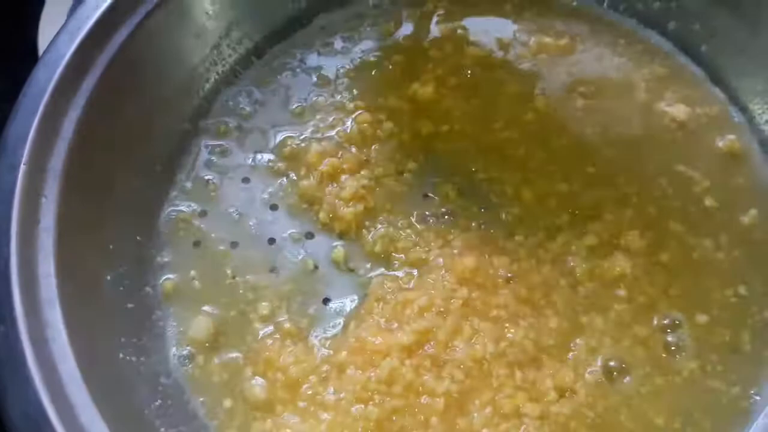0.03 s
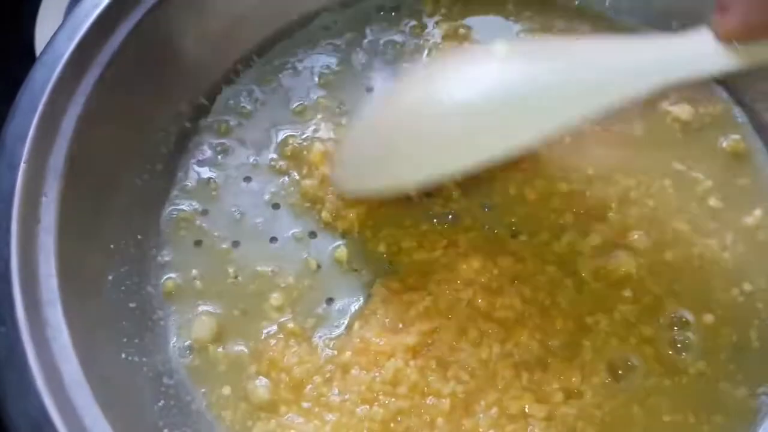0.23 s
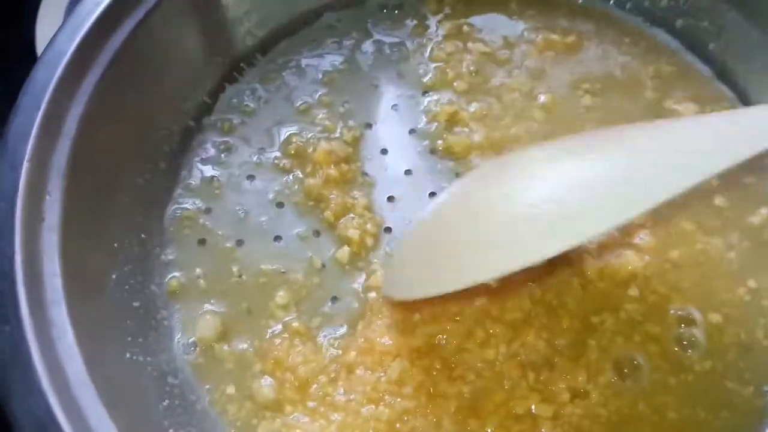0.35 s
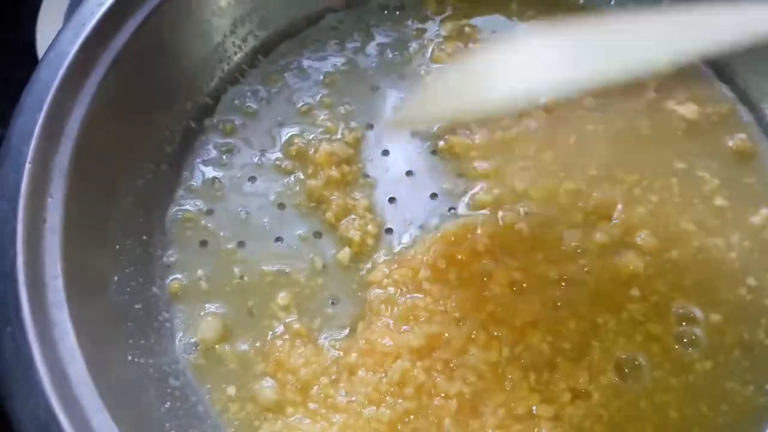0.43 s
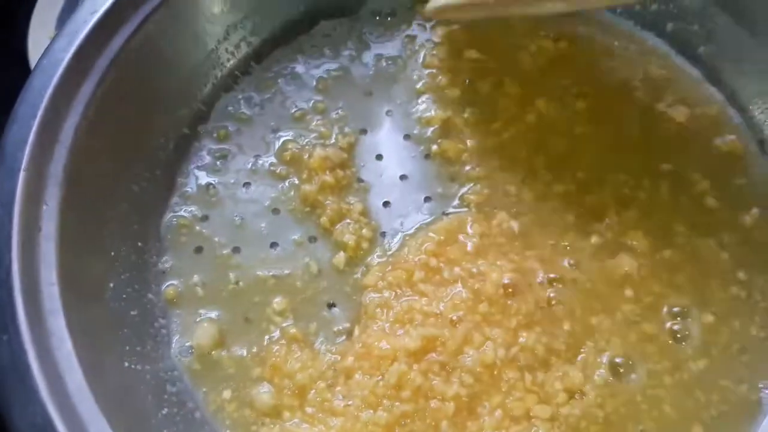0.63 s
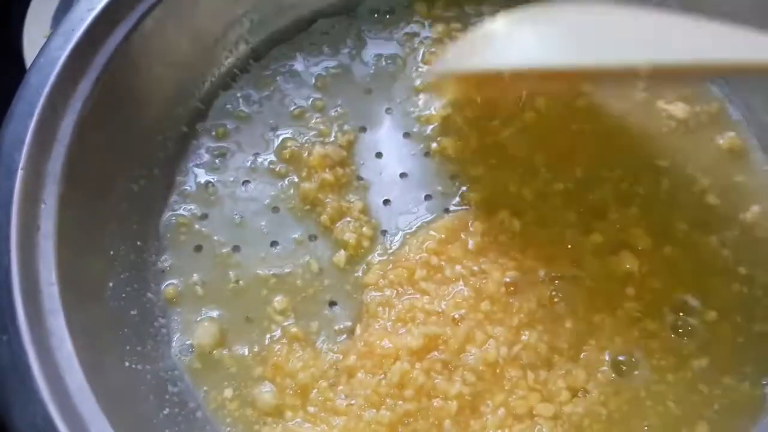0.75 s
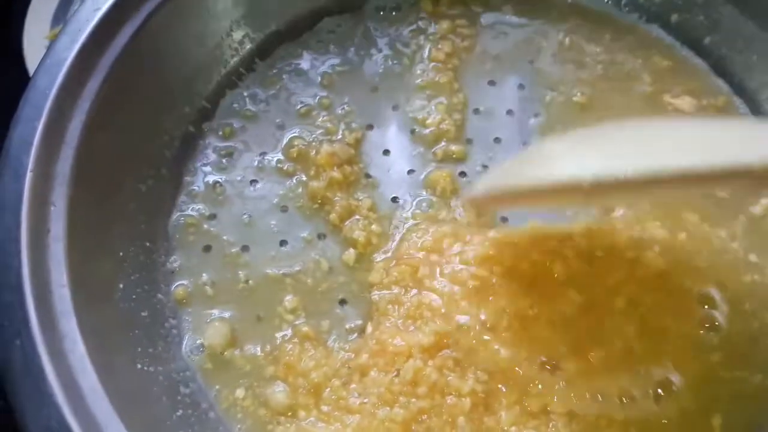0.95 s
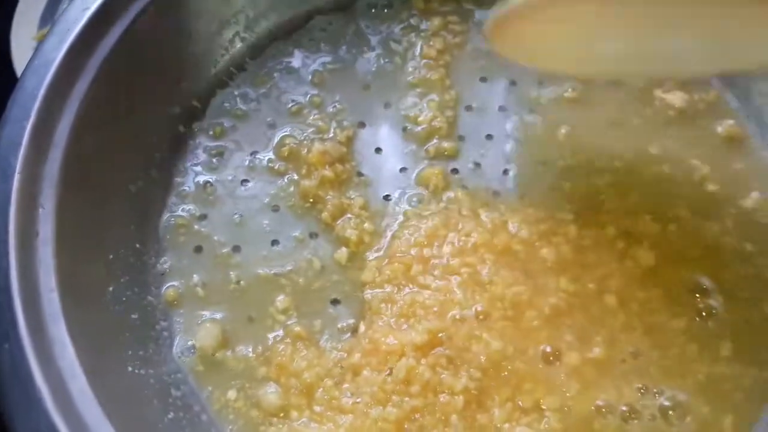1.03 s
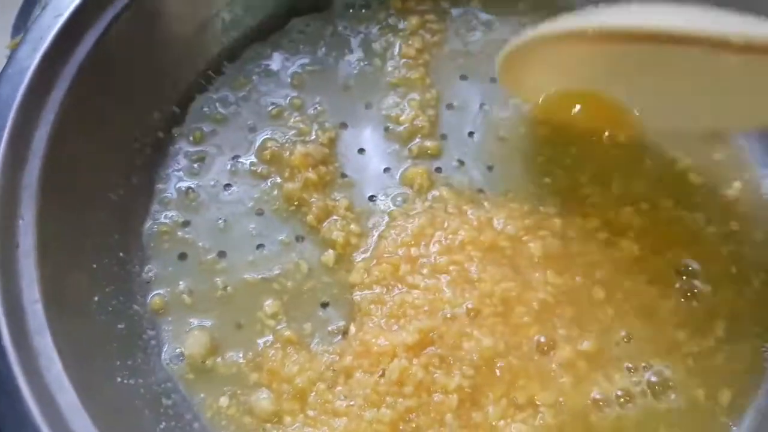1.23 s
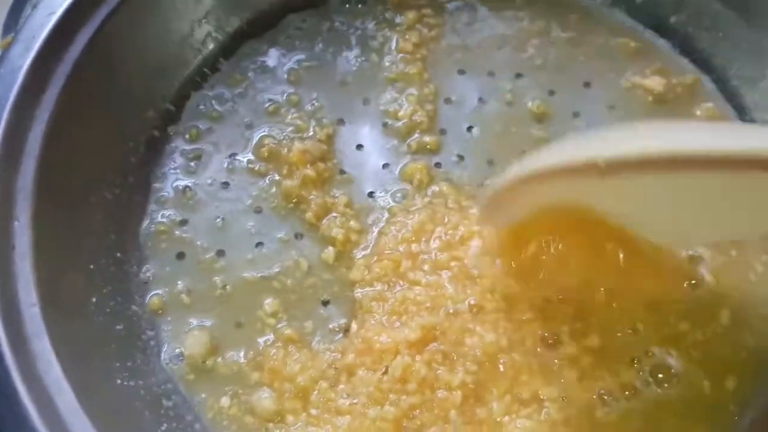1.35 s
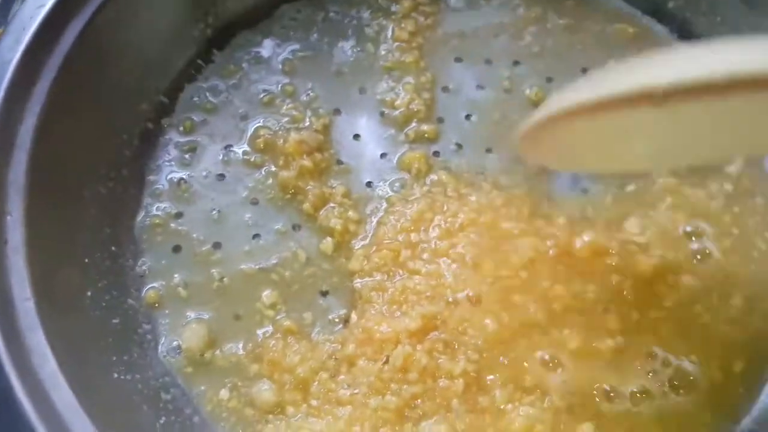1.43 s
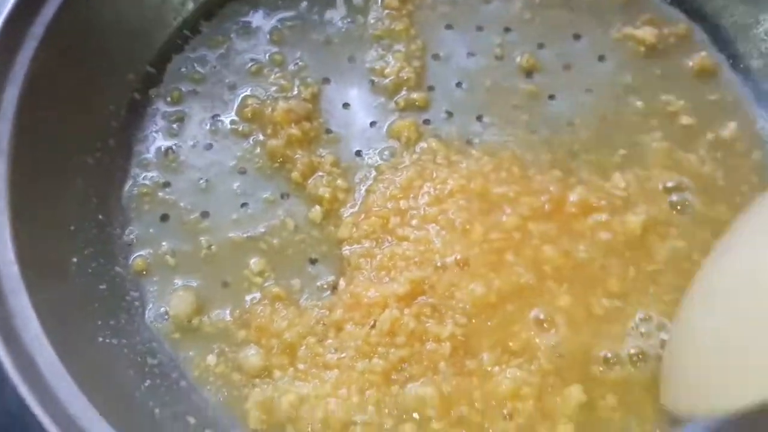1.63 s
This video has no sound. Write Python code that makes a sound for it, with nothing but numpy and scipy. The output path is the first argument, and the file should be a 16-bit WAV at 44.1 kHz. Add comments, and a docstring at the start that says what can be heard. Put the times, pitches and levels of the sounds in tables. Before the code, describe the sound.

Close up in a quiet kitchen, a plastic spoon bumps and rasps over a metal strainer three times, with short pauses between. The steel clanks and groans briefly, the pot underneath resonates, and wet pulp squelches very softly.

```python
"""A plastic spoon works wet pulp through a steel strainer; close, small kitchen, faint air and hum.
0.2 s: first stroke. The loaded sheet booms, the edge rasps over the holes, the pot below rings low.
0.4-0.7 s: the spoon squeaks thinly on wet steel; the pulp squelches softly.
0.7 s, 1.2 s: second and third strokes, again with groans of the sheet and knocks on the wall.
1.55 s: a last squelch while pot and room die away."""
import sys
import numpy as np
from scipy import signal
from scipy.fft import rfft, irfft, next_fast_len
from scipy.io import wavfile

SR = 44100
rng = np.random.default_rng(int(sys.argv[2]) if len(sys.argv) > 2 else 0)


def unload_audio(sound):
    """Save the sound as a 16-bit wav file, at the path given as the first command line argument."""
    columns = np.transpose(np.atleast_2d(sound))
    # keep every value between -1 and 1, then stretch to whole-number steps
    steps = np.round(np.clip(columns, -1, 1) * 32767)
    wavfile.write(sys.argv[1], SR, steps.astype(np.int16))


N = 74970
T = np.arange(N) / SR

# spoon contacts: start_s, boom_hz, boom_db, pot_db, spot_hz, clank_db, wall_db, click_db, lowpass_hz
CONTACTS = [(0.2161, 321.6, -23.5, -27.5, 1134, -29, -50, -45, 11000),
            (0.2805, 315.2, -31, -29.5, 1141, -32, -44, -49.5, 7000),
            (0.2985, 324.6, -25, -40, 1077, -35, -48, -56, 5000),
            (0.3180, 317.8, -25.5, -27, 540, -32.5, -62, -64, 2930),
            (0.3890, 308, -34.5, -31.5, 1074, -43.5, -63, -46, 11200),
            (0.7290, 307, -27, -25.5, 1114, -32.5, -50, -48.5, 3120),
            (0.7480, 305.8, -25, -32, 1150, -39.5, -55, -58, 8000),
            (0.8520, 342.7, -36.5, -28.5, 1225, -42, -52, -39.5, 14300),
            (0.8730, 306, -37, -21.5, 984, -37.5, -74, -44.5, 9400),
            (0.9166, 362, -31, -24.5, 1014, -25, -40, -38, 7400),
            (0.9740, 300, -39, -51, 720, -69, -83, -53.5, 6250),
            (1.211, 266, -40, -31.5, 470, -66, -58, -78, 2020),
            (1.2642, 297.6, -34, -24, 537, -29.5, -41.5, -43, 12400),
            (1.3140, 313.6, -38.5, -38.5, 1106, -33, -48, -47, 9900),
            (1.3862, 292, -32.5, -22.5, 1095, -27, -38, -37, 10500),
            (1.4300, 331.5, -37.5, -28.5, 981, -36, -58, -43.5, 4000)]
# spoon dragged over the holes: start_s, length_s, judder_db, rasp_db
DRAGS = [(0.226, 0.066, -35, -53.5), (0.284, 0.036, -30.5, -48.5), (0.331, 0.052, -49.5, -52),
         (0.387, 0.012, -36.5, -44), (0.737, 0.057, -36, -65), (0.79, 0.056, -50, -56.5),
         (0.859, 0.059, -38, -51.5), (0.924, 0.03, -40.5, -47.5), (1.19, 0.099, -56, -69.5),
         (1.268, 0.041, -31, -54), (1.322, 0.0473, -42, -54), (1.384, 0.031, -31.5, -53)]
# friction tones: start_s, length_s, pitch_hz, level_db
SHEET_GROANS = [(0.2303, 0.06, 315.5, -25), (0.315, 0.027, 303, -30.5), (0.738, 0.037, 308.5, -31.5),
                (1.285, 0.059, 306.5, -36)]
SPOON_SQUEAKS = [(0.425, 0.02, 3000, -65), (0.654, .055, 2430, -67.5)]
# pulp shifting: start_s, length_s, pitch_hz, log_pitch_spread, level_db
PULP_SHIFTS = [(0.546, 0.018, 3230, 0.11, -65.5), (0.654, 0.054, 2670, 0.18, -67.5),
               (1.179, 0.13, 2160, .2, -62), (1.187, 0.068, 406, 0.26, -49.5),
               (1.564, 0.066, 3519, 0.3, -69.5)]

# modes of pot with strainer, sheet (mid, high), bare wall: pitch_hz, gain_db, t60_s
POT_MODES = [(92.3, -18, 0.79), (108.9, -14.5, 0.2), (127, -27.5, 0.067), (209.6, -12, 0.15),
             (233.2, -22.5, 0.92), (269.4, -16, 0.36), (358, -9.5, 0.4), (398.4, -10, 0.29)]
SHEET_MODES = [(539, -9, 0.46), (553.2, 0, 0.28), (694.7, 0, 0.23), (741, -5, 0.28), (828.4, -5, 0.22),
               (994, -12, 0.14), (1150, -1.5, 0.13), (1244.5, -0.5, 0.14), (1300, -26, 0.89)]
PING_MODES = [(3663, 3, 0.094), (3950, -1, 0.17), (4280, 1.5, 0.092), (5000, -6, 0.11), (5520, -3, 0.066),
              (7320, -18, .12), (8190, -22, 0.066)]
WALL_MODES = [(1498, -8.5, 0.18), (1706, -6.5, 0.2), (1795, -5, 0.23), (1938, 5.5, 0.054), (2019, 0, 0.088),
              (2063, -3.5, 0.049), (2368, -7.5, 0.16)]

# contact noise spectra: freq_hz, gain_db
CLANK_SPECTRUM = [(60, -46), (120, 2), (180, -12), (280, 12), (450, 0), (680, 7.5), (880, -3.5),
                  (1080, 6.5), (1500, -8), (2020, -9.5), (2600, -30), (5000, -47)]
CLICK_SPECTRUM = [(800, 7.5), (2000, 4), (3100, 0), (3900, 0), (4600, -1.5), (5250, 6), (6300, -1),
                  (7150, 1.5), (7950, -5), (8600, 1.5), (9900, -8), (12500, -8.5), (15500, -28)]
JUDDER_SPECTRUM = [(50, -76), (110, 4.5), (170, -11.5), (320, 15.5), (450, 3), (560, 2), (880, -6),
                   (1100, -6), (1500, -12), (2000, -16.5), (2800, -23.5), (6000, -51)]
# room air spectra, mid and side: freq_hz, gain_db
AIR_SPECTRUM = [(15, -33), (25, -13), (150, -5.5), (309, 0), (573, -12.5), (637, -5.5), (691, -16),
                (811, -9.5), (1310, -21.5), (3440, -29.5), (4040, -28), (4620, -38.5), (15000, -46.5)]
SIDE_AIR_SPECTRUM = [(25, 4), (100, -5), (400, -4.5), (1500, -7), (5000, -19), (9000, -25), (15000, -36.5)]
# room decay: freq_hz, t60_s
ROOM_DECAY = [(100, 0.26), (300, 0.53), (1000, 0.47), (2500, 0.42), (6000, 0.3), (12000, 0.63)]
# room tail and side reflections: freq_hz, gain_db
ROOM_GAIN = [(100, -23), (300, -13), (700, -11), (2000, -9.5), (6000, -6.5), (12000, -27)]
SIDE_GAIN = [(30, -26), (70, -32), (300, -43), (1000, -34), (2500, -17.5), (5000, -17), (12000, -12)]

BOOM_T60_S, SPOT_T60_S, CLANK_T60_S, CLICK_T60_S, CRACK_T60_S = 0.18, 0.13, 0.11, 0.067, 0.007
BOOM_RISE_S, POT_RISE_S, SWELL_S, RELEASE_T60_S = 0.0015, 0.015, 0.0058, 0.056
POT_TRIM_DB, SHEET_TRIM_DB, SPOT_TRIM_DB = -3.5, -7.5, -11
CLANK_NOISE_TRIM_DB, PING_TRIM_DB, CRACK_TRIM_DB = -4, -12, -6


def knocks():
    """Each contact booms the laden sheet and the pot, rings the steel and clicks; pulp dulls it."""
    out = np.zeros(N)
    for start_s, boom_hz, boom_db, pot_db, spot_hz, clank_db, wall_db, click_db, lowpass_hz in CONTACTS:
        boom = unit_onset(-sine(boom_hz) * decay(BOOM_T60_S) * (1 - np.exp(-T / BOOM_RISE_S)))
        pot = amp(POT_TRIM_DB) * ring(POT_MODES, scatter_db=3.5) * (1 - np.exp(-T / POT_RISE_S))
        clank = amp(SHEET_TRIM_DB) * unit_onset(ring(SHEET_MODES, scatter_db=2.5))
        clank += amp(SPOT_TRIM_DB) * unit_onset(sine(spot_hz) * decay(SPOT_T60_S))
        clank += amp(CLANK_NOISE_TRIM_DB) * burst(CLANK_SPECTRUM, CLANK_T60_S)
        click = burst(CLICK_SPECTRUM, CLICK_T60_S)
        click += amp(PING_TRIM_DB) * unit_onset(ring(PING_MODES, scatter_db=5.5))
        click += amp(CRACK_TRIM_DB) * burst(CLICK_SPECTRUM, CRACK_T60_S)
        wall = unit_onset(ring(WALL_MODES, scatter_db=1.5))
        blow = amp(boom_db) * boom + amp(pot_db) * pot
        blow += amp(clank_db) * clank + amp(click_db) * click + amp(wall_db) * wall
        out += delayed(kitchen(butterworth(blow, lowpass_hz, "low")), start_s)
    return out


def scrapes(rise_s=0.0047):
    """The spoon's edge catches on holes and grit: the sheet judders and rasps."""
    judder_env = sum(amp(db) * envelope(start_s, length_s, rise_s) for start_s, length_s, db, _ in DRAGS)
    rasp_env = sum(amp(db) * envelope(start_s, length_s, rise_s) for start_s, length_s, _, db in DRAGS)
    judder = coloured(catches(rate_per_s=900), JUDDER_SPECTRUM)
    rasp = grit_clumps() * coloured(catches(rate_per_s=3500), CLICK_SPECTRUM)
    return kitchen(judder_env * judder + rasp_env * rasp)


def catches(rate_per_s, spread_db=3.5):
    """Tiny irregular impulses of uneven size."""
    hits = rng.random(N) < rate_per_s / SR
    return hits * amp(spread_db * np.clip(noise(), -2, 2)) * rng.choice([-1, 1], N)


def grit_clumps(depth_db=2, cutoff_hz=120):
    """Uneven gain: grit passes under the edge in bunches."""
    return unit_rms(amp(depth_db * np.clip(drift(cutoff_hz), -2, 2)))


def friction_tones():
    """The sheet groans under pressure and squeaks under a light touch."""
    groans = stick_slip(SHEET_GROANS, wander_ratio=0.012, wander_cutoff_hz=41.2, rise_s=0.012)
    squeaks = stick_slip(SPOON_SQUEAKS, wander_ratio=0.04, wander_cutoff_hz=300, rise_s=SWELL_S)
    return groans + squeaks


def stick_slip(tones, wander_ratio, wander_cutoff_hz, rise_s):
    """Unsteady tones kept up by sticking and slipping."""
    out = np.zeros(N)
    for start_s, length_s, pitch_hz, level_db in tones:
        freq_hz = pitch_hz * (1 + wander_ratio * drift(wander_cutoff_hz))
        cycles = np.cumsum(freq_hz * (T > start_s)) / SR
        tone = np.sqrt(2) * np.sin(2 * np.pi * cycles)
        out += amp(level_db) * envelope(start_s, length_s, rise_s) * tone
    return kitchen(out)


def squelches(count=400, rate_per_s=2500, bubble_q=18, pop_samples=900):
    """Swarms of tiny bubbles burst as the pulp shifts."""
    out, t = np.zeros(N), T[:pop_samples]
    for start_s, length_s, pitch_hz, spread, level_db in PULP_SHIFTS:
        onsets = (rng.random((count, 1)) * SR * count / rate_per_s).astype(int)
        cycles = pitch_hz * np.exp(spread * rng.standard_normal((count, 1))) * t
        pop_env = rng.random((count, 1)) * (1 - t / t[-1]) * np.exp(-np.pi * cycles / bubble_q)
        pops = pop_env * np.sin(2 * np.pi * cycles)
        swarm = unit_rms(np.bincount((onsets + np.arange(pop_samples)).ravel(), pops.ravel()))
        swarm = delayed(np.pad(swarm, (0, N)), start_s)
        out += amp(level_db) * envelope(start_s, length_s, SWELL_S) * swarm
    return kitchen(out)


def kitchen(x, predelay_s=0.005):
    """Direct sound plus the room's short diffuse tail."""
    hz, t, spectra = signal.stft(rng.standard_normal(SR * 2 // 3), SR, nperseg=256)
    decay_per_s = np.log(1000) / log_interp(ROOM_DECAY, hz)[:, None]
    tail_env = np.exp(-decay_per_s * t) * np.sqrt(2 * decay_per_s / SR)  # unit energy
    gain = amp(log_interp(ROOM_GAIN, hz))[:, None]
    tail = signal.istft(spectra * tail_env * gain, SR, nperseg=256)[1]
    return x + delayed(signal.fftconvolve(x, tail)[:N], predelay_s)


def side_reflections(x, t60_s=0.19):
    """Scattered reflections widen the treble a little."""
    scatter = noise() * decay(t60_s)
    reflections = signal.fftconvolve(x, scatter / np.linalg.norm(scatter))[:N]
    return filtered(reflections, lambda hz: amp(log_interp(SIDE_GAIN, hz)))


def background(air_db=-63, side_air_db=-76.5, hum_hz=93.6, hum_db=-70.5):
    """Still room air with a faint low hum: (mid, side)."""
    side = amp(side_air_db) * coloured(noise(), SIDE_AIR_SPECTRUM)
    mid = amp(air_db) * coloured(noise(), AIR_SPECTRUM) + amp(hum_db) * sine(hum_hz)
    return mid, side


def ring(modes, scatter_db):
    """Damped modes, 1 s long; levels vary per strike."""
    out = sum(amp(db + scatter_db * rng.normal()) * decay(t60_s)[:SR] * np.sin(2 * np.pi * hz * T[:SR])
              for hz, db, t60_s in modes)
    return np.pad(out, (0, N - SR))


def burst(spectrum, t60_s):
    """Decaying coloured noise."""
    return unit_onset(coloured(noise(), spectrum) * decay(t60_s))


def envelope(start_s, length_s, rise_s):
    """Rise, hold, release."""
    attack = 1 - np.exp(-np.maximum(T - start_s, 0) / rise_s)
    return attack * np.exp(-np.log(1000) * np.maximum(T - start_s - length_s, 0) / RELEASE_T60_S)


def amp(db):
    return 10 ** (np.asarray(db) / 20)


def sine(hz):
    return np.sin(2 * np.pi * hz * T)


def noise():
    return rng.standard_normal(N)


def drift(cutoff_hz):
    return unit_rms(butterworth(noise(), cutoff_hz, "low"))


def decay(t60_s):
    return np.exp(-np.log(1000) * T / t60_s)


def delayed(x, delay_s):
    return np.pad(x, (round(delay_s * SR), 0))[:N]


def unit_rms(x):
    return x / np.sqrt(np.mean(x ** 2) + 1e-20)


def unit_onset(x, onset_samples=660):
    """Rms 1 over the onset."""
    return x / np.sqrt(np.mean(x[:onset_samples] ** 2) + 1e-20)


def log_interp(points, hz):
    freqs_hz, values = np.transpose(points)
    return np.interp(np.log(hz + 1), np.log(freqs_hz + 1), values)


def filtered(x, response):
    size = next_fast_len(N + SR // 2)
    return irfft(rfft(x, size) * response(np.fft.rfftfreq(size, 1 / SR)), size)[..., :N]


def coloured(x, spectrum):
    return unit_rms(filtered(x, lambda hz: amp(log_interp(spectrum, hz))))


def butterworth(x, cutoff_hz, kind, order=2):
    return signal.sosfilt(signal.butter(order, cutoff_hz, kind, fs=SR, output="sos"), x)


def scene(low_cut_hz=66):
    """Spoon work over room air; nearly mono, little deep bass."""
    work = knocks() + scrapes() + friction_tones() + squelches()
    work = butterworth(work, low_cut_hz, "high", order=4)
    reflections = side_reflections(work)
    air_mid, air_side = background()
    mid, side = work + air_mid, reflections + air_side
    return np.array([mid + side, mid - side])


def record(dry, top_hz=15900):
    """Brick-wall low-pass."""
    return filtered(dry, lambda hz: hz < top_hz)


dry = scene()
out = record(dry)
unload_audio(out)
```